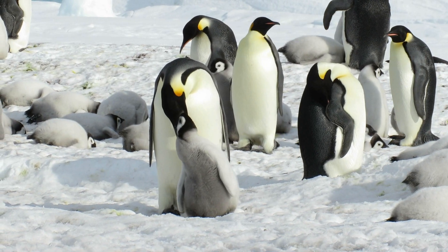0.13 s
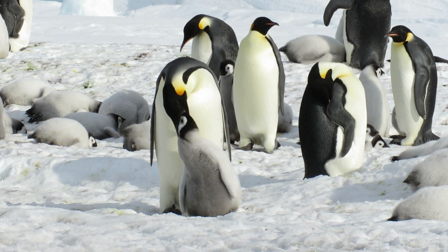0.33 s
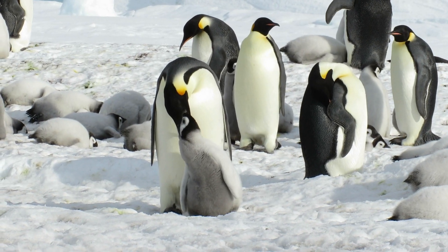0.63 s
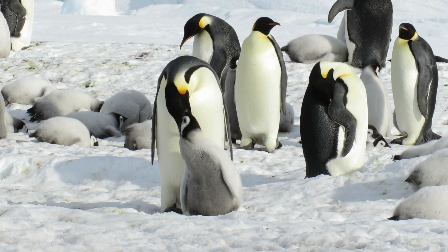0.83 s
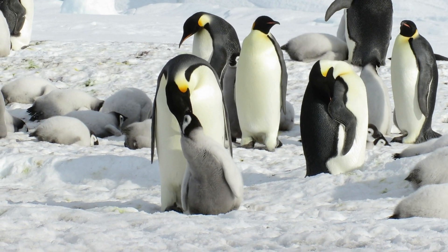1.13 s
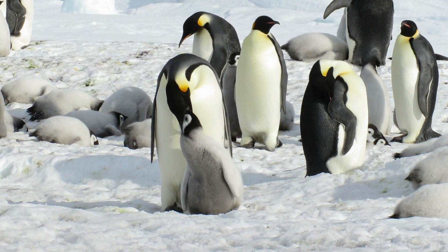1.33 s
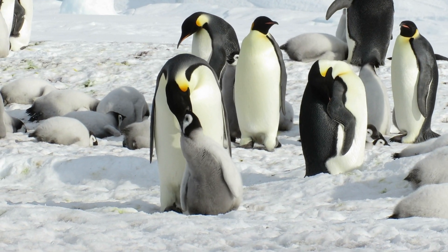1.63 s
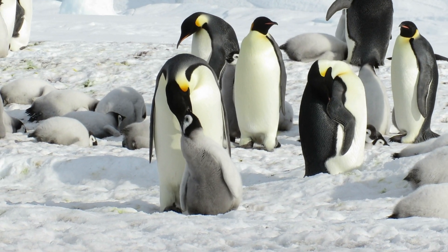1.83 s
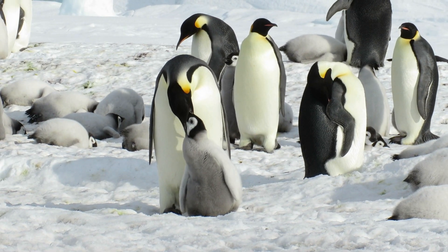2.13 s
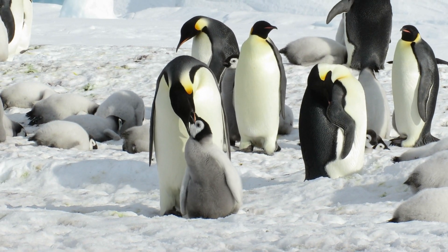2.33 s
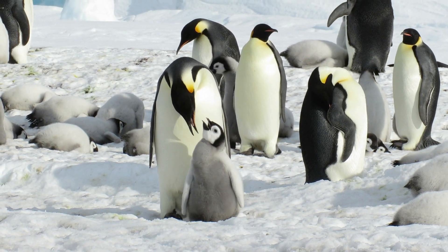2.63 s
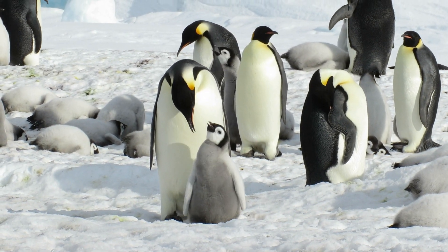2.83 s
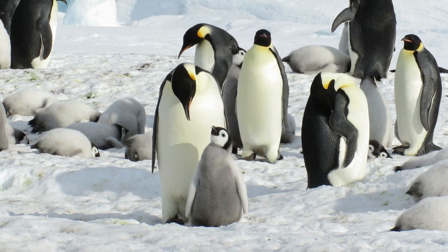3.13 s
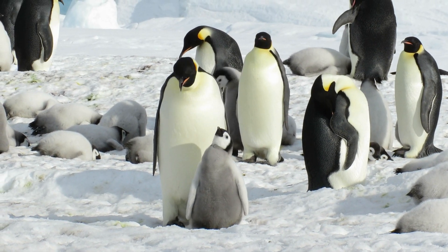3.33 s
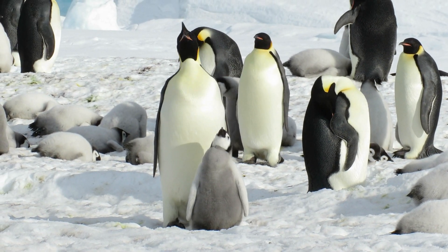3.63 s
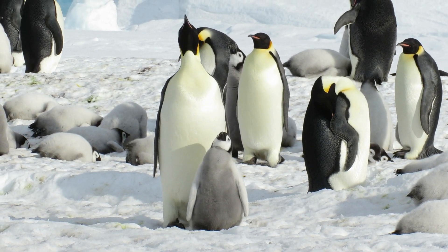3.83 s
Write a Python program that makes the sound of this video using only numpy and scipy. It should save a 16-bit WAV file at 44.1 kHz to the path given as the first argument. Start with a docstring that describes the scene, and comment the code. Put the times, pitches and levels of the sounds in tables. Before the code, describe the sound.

Penguin chicks beg with high, warbling whistles that mostly sink, at about 0.1-0.7 and 1.2-1.75 seconds, overlapped by peeps, thin chirps, steep swoops and brief grainy rasps. After a sparser gap, a brighter whistle falls at 2.3-2.55. Swoops cluster around 2.8-3.2, a faint pure whistle follows, then sharper swoops from 3.65 to 4. Distant colony chatter and low wind continue; a faint adult drone enters near 3.7. Open, dry air.

```python
"""Penguin chicks beg on open snow: the nearest give long warbling whistles, most of them sinking at the end,
their neighbours gentle peeps, steep swoops and thin chirps, with grainy rasps at times.
Behind them lie the chatter of the far colony, a low wind and, near the end, a faint drone of far adults.
Each chick voice is a few harmonics of a moving pitch, weighted by throat resonances, hoarse in fast glides;
rasps, wind, drone and the blur of the farthest chicks are filtered noise."""
import sys
import numpy as np
from scipy.fft import rfft, irfft, next_fast_len
from scipy.io import wavfile

SR = 44100
rng = np.random.default_rng(int(sys.argv[2]) if len(sys.argv) > 2 else 0)


def to_wav(sig):
    """Store sig (one row per channel, or 1-D mono) as 16-bit WAV at the path in sys.argv[1].

    Samples outside -1..1 are clipped; the rate is SR.
    """
    pcm = np.clip(np.atleast_2d(sig), -1, 1) * 32767
    pcm = np.round(pcm).astype(np.int16)
    wavfile.write(sys.argv[1], SR, pcm.T)  # frames by channels


N = 176400
T = np.arange(N) / SR

# resonances of throat and bill: (frequency [Hz], relative gain [dB])
THROAT = [(900, -17), (1350, -1.5), (1750, 0), (2100, -2), (2800, -16.5), (3500, -14), (5200, -28),
          (9000, -44), (15000, -64)]
SMALL_THROAT = [(900, -11.5), (1450, -1), (2100, 2.5), (2750, -14.5), (4250, -12), (5300, -30),
                (15000, -60)]
# spectrum of hoarse noise: (frequency [Hz], relative gain [dB])
RASP_SPECTRUM = [(1000, -19), (1800, 6), (4000, 6.5), (7000, -15), (15000, -26.5)]

# shared by swoops and chirps; tilts are per octave above the fundamental
SMALL_VOICE_TILT_DB = -1.5
PITCH_JITTER, SHIMMER_DB, OVERTONE_FLUTTER_DB = 0.0041, 2.5, 5  # jitter: share of the pitch
RELEASE_S = 0.012


def amp(db):
    """Decibels to amplitude."""
    return 10 ** (np.asarray(db) / 20)


def unit(x):
    """x scaled to rms 1."""
    return x / np.sqrt(np.mean(x ** 2) + 1e-20)


def along(points, hz):
    """(Hz, dB) points interpolated on a log frequency axis."""
    point_hz, point_db = np.transpose(points)
    return np.interp(np.log(hz + 1), np.log(point_hz + 1), point_db)


def wobble(knots_per_s, size):
    """Random curve: straight lines between normal random knots."""
    knots = rng.standard_normal(int(size * knots_per_s / SR) + 4)
    return np.interp(np.arange(size) * knots_per_s / SR, np.arange(len(knots)), knots)


def glide(s, v, t):
    """Smooth cubic curve through the points (s, v); inner slopes are limited against overshoot."""
    span = np.maximum(np.diff(s), 1e-4)
    slope = np.diff(v) / span
    # harmonic mean of neighbouring slopes, zero at a turning point
    inner = 2 * np.maximum(slope[:-1] * slope[1:], 0) / (slope[:-1] + slope[1:] + 1e-9)
    knot_slope = np.r_[2 * slope[0] - inner[0], inner, 2 * slope[-1] - inner[-1]]
    i = np.clip(np.searchsorted(s, t) - 1, 0, len(slope) - 1)
    u = (t - s[i]) / span[i]
    start_bend = (knot_slope[i] - slope[i]) * (1 - u)
    end_bend = (knot_slope[i + 1] - slope[i]) * u
    return v[i] + span[i] * u * (slope[i] + (1 - u) * (start_bend - end_bend))


def filtered(x, response):
    """x with its spectrum multiplied by a response of frequency."""
    size = next_fast_len(N + SR // 2)
    return irfft(rfft(x, size) * response(np.fft.rfftfreq(size, 1 / SR)), size)[:N]


def noise(spectrum):
    """Coloured noise of rms 1."""
    return unit(filtered(rng.standard_normal(N), lambda hz: amp(along(spectrum, hz))))


def add(out, start_s, x):
    """Mix x into out at start_s, cut to its ends."""
    i = int(start_s * SR)
    x = x[max(-i, 0):max(N - i, 0)]
    out[max(i, 0):][:len(x)] += x


def voice(pitch_hz, throat, tilt_db, evenness=0, hoarse_db=-70, jitter=PITCH_JITTER, attack_s=0.0043, count=3):
    """Harmonics of an unsteady pitch through a throat, hoarse in fast glides; evenness 1 levels the gains."""
    n = len(pitch_hz)
    k = np.arange(1, count + 1)[:, None]
    phase = 2 * np.pi * np.cumsum(pitch_hz * (1 + jitter * wobble(600, n))) / SR

    flutter = np.array([wobble(48.05, n) for _ in k]) * (k > 1)
    gains_db = along(throat, k * pitch_hz) + tilt_db * np.log2(k) + OVERTONE_FLUTTER_DB * flutter
    gains = amp(gains_db) * (k * pitch_hz < SR / 2)
    gains = gains / np.linalg.norm(gains, axis=0) ** evenness
    tone = unit((gains * np.sin(k * phase)).sum(0))

    # hiss grows with glide speed and pulses once per pitch cycle
    hiss_gain = amp(along(RASP_SPECTRUM, np.fft.rfftfreq(n, 1 / SR)))
    hiss = unit(irfft(rfft(rng.standard_normal(n)) * hiss_gain, n))
    octaves_per_s = np.abs(np.gradient(np.log2(pitch_hz))) * SR
    hoarse = amp(hoarse_db) * octaves_per_s * (1 + np.cos(phase))

    t = np.arange(n) / SR
    gate = np.clip(t / attack_s, 0, 1) * np.clip((t[-1] - t) / RELEASE_S, 0, 1)
    return (tone + hoarse * hiss) * gate * amp(SHIMMER_DB * wobble(250, n))


def wind():
    """Wind: a steady rush of coloured noise, with soft low puffs where it touches the microphone."""
    # wind spectrum: (frequency [Hz], relative gain [dB])
    air = [(25, -22.5), (62, -1), (200, -7.5), (700, -12.5), (1200, -5.5), (4000, -29.5), (15000, -36)]
    # puffs: middle [s]
    puff_times = [2.1, 3.27]
    wind_db = -66.5
    puff_db, puff_scale_hz, puff_half_s = -65.5, 85.5, 0.036
    puffs = sum(np.exp(-((T - s) / puff_half_s) ** 2) for s in puff_times)
    rumble = unit(filtered(rng.standard_normal(N), lambda hz: hz * np.exp(-(hz / puff_scale_hz) ** 2)))
    return amp(wind_db) * noise(air) + amp(puff_db) * puffs * rumble


def adults():
    """Far adults: noise in two resonances an octave apart, a faint, blurred, pulsing drone."""
    # drone level: (time [s], level [dB])
    drone_level = [(3.6, -83), (3.8, -66.5)]
    drone_hz, half_width_hz = 444, 40

    def response(hz):
        return sum(k ** -2 / (1 + ((hz - k * drone_hz) / half_width_hz) ** 2) for k in (1, 2))

    drone = filtered(rng.standard_normal(N), response)
    pulsing = unit(drone * amp(1.1 * wobble(20, N)))
    return amp(np.interp(T, *np.transpose(drone_level))) * pulsing


def colony():
    """Far chicks: random calls, short ones swinging widely in pitch, over a noise blur of still farther ones."""
    centre_hz, blur_width, blur_db = 1680, 0.28, -70  # width: share of each band's centre
    calls_per_s, softest_db, spread_db = 70, -71, 12
    pitch_swing, tilt_db = 0.26, 4  # swing in natural log of pitch

    def response(hz):
        return sum(k ** -2 * np.exp(-((hz / k / centre_hz - 1) / blur_width) ** 2) for k in (1, 2))

    blur = filtered(rng.standard_normal(N), response)
    out = amp(blur_db + 6 * wobble(25, N)) * unit(blur)
    for when, length, size, pitch, turn in rng.random((int(calls_per_s * N / SR), 5)):
        length_s = 0.03 + 0.11 * length ** 2
        u = np.linspace(0, 1, int(length_s * SR))
        bend = (1 - length ** 2) * np.sin(2 * np.pi * (u + turn))
        pitch_hz = centre_hz * np.exp(pitch_swing * (pitch - 0.5 + bend))
        call = voice(pitch_hz, THROAT, tilt_db, attack_s=RELEASE_S, count=2)
        add(out, when * N / SR - len(u) / SR / 2, amp(softest_db + spread_db * size ** 3) * call)
    return out


def rasps():
    """Rasps: noise with fast random level flutter swells where a voice breaks up."""
    # hoarse stretches: (middle [s], half length to 1/e [s], peak level [dB])
    stretches = [(0.162, 0.043, -54.5), (1.002, 0.0096, -56), (1.2, 0.033, -53.5), (3.0, 0.17, -71.5),
                 (3.71, 0.021, -60)]
    swell = sum(amp(db) * np.exp(-((T - s) / half_s) ** 2) for s, half_s, db in stretches)
    grain = unit(noise(RASP_SPECTRUM) * amp(4.5 * wobble(450, N)))
    return swell * grain


def chirps():
    """Thin chirps: a quick arch of pitch, up and down again, in two harmonics."""
    # chirps: middle [s]
    middles = [0.047, 0.087, 0.429, 0.863, 1.802, 2.566]
    length_s, top_hz, drop, level_db = 0.045, 2630, 0.35, -53.5  # drop: share of the top pitch
    out = np.zeros(N)
    u = np.linspace(-1, 1, int(length_s * SR))
    pitch_hz = top_hz * (1 - drop * u ** 2)
    for middle_s in middles:
        call = voice(pitch_hz, SMALL_THROAT, SMALL_VOICE_TILT_DB, evenness=0.26, attack_s=0.0082, count=2)
        add(out, middle_s - length_s / 2, amp(level_db) * call)
    return out


def swoops():
    """Swoops: the pitch plunges, rests low and shoots up; the flanks cross the throat resonances hoarsely."""
    # swoops: (start [s], end [s], lowest pitch [Hz], level [dB])
    calls = [(0.0, 0.066, 1175, -57), (0.09, 0.19, 1345, -50.5), (0.22, 0.251, 2300, -44),
             (0.254, 0.319, 2093, -49), (0.342, 0.396, 1552, -45.5), (0.466, 0.526, 1512, -44),
             (0.567, 0.607, 1614, -46.5), (0.922, 1.004, 1510, -51), (1.825, 1.919, 1427, -56.5),
             (2.065, 2.128, 1293, -58.5), (2.775, 2.821, 1643, -57), (2.911, 2.972, 1557, -53.5),
             (2.921, 2.999, 1374, -48), (3.0, 3.101, 1602, -55), (3.013, 3.101, 1154, -51),
             (3.105, 3.196, 923, -52), (3.644, 3.712, 1313, -59), (3.679, 3.736, 1692, -52.5),
             (3.812, 3.854, 1957, -43.5), (3.888, 3.959, 1462, -43.5), (3.98, 4.035, 1303, -43.5)]
    edge_hz, steepness, jitter = 2750, 2.1, 0.016  # jitter: roughness, share of the pitch
    out = np.zeros(N)
    for start_s, end_s, low_hz, db in calls:
        u = np.abs(np.linspace(-1, 1, int((end_s - start_s) * SR)))
        pitch_hz = low_hz * (edge_hz / low_hz) ** (u ** steepness)
        call = voice(pitch_hz, SMALL_THROAT, SMALL_VOICE_TILT_DB, hoarse_db=-53.5, jitter=jitter, count=4)
        add(out, start_s, amp(db) * call)
    return out


def peeps():
    """Neighbours' peeps: a soft start and a gentle parabolic bend of pitch, louder near the throat resonance."""
    # (start [s], end [s], first pitch [Hz], turning pitch [Hz], last pitch [Hz], level before gain_db [dB])
    calls = [(0.094, 0.189, 2382, 2000, 2214, -48), (0.267, 0.363, 1653, 1680, 1840, -48),
             (0.367, 0.418, 2120, 1923, 2166, -45.5), (0.62, 0.684, 1420, 1740, 1370, -50.5),
             (0.828, 0.906, 2000, 1451, 1720, -54), (0.988, 1.12, 1750, 1224, 1560, -63),
             (1.117, 1.171, 1450, 1800, 1840, -51.5), (1.163, 1.22, 1900, 1407, 1970, -48.5),
             (1.221, 1.41, 1797, 1202, 1250, -54.5), (1.322, 1.381, 1603, 1793, 1793, -48.5),
             (1.542, 1.599, 2300, 1524, 1523, -47), (2.236, 2.404, 1730, 1316, 1366, -54.5),
             (2.834, 2.887, 1667, 1610, 2260, -52.5), (3.081, 3.223, 1750, 1378, 1780, -48),
             (3.78, 3.911, 1936, 1554, 1807, -55)]
    gain_db, tilt_db, attack_s = 4, -4, 0.018
    out = np.zeros(N)
    for start_s, end_s, first_hz, turn_hz, last_hz, db in calls:
        u_first = -abs(first_hz - turn_hz) ** 0.5
        u_last = abs(last_hz - turn_hz) ** 0.5
        u = np.linspace(u_first, u_last, int((end_s - start_s) * SR))
        pitch_hz = turn_hz + np.sign(first_hz + last_hz - 2 * turn_hz) * u ** 2
        add(out, start_s, amp(db + gain_db) * voice(pitch_hz, THROAT, tilt_db, attack_s=attack_s))
    return out


def whistles():
    """Near chicks: pitch and level swing along turning points; one smaller throat, one call without overtones."""
    # turning points of each whistle: (time [s], pitch [Hz], level before gain_db [dB])
    whistle_1 = [(0.122, 1928, -40), (0.143, 2010, -43.5), (0.162, 1571, -67), (0.172, 1927, -36.5),
                 (0.211, 1570, -40), (0.243, 1837, -34.5), (0.284, 1471, -44), (0.355, 942, -49.5)]
    whistle_2 = [(0.448, 1764, -38), (0.468, 1605, -42), (0.509, 1226, -46.5), (0.553, 1615, -40),
                 (0.575, 1767, -36.5), (0.614, 1393, -42), (0.65, 1201, -47), (0.681, 1268, -48.5),
                 (0.733, 951, -53)]
    whistle_3 = [(1.161, 2063, -34), (1.185, 2063, -36.5), (1.201, 1654, -52.5), (1.22, 2066, -34.5),
                 (1.239, 1844, -33.5), (1.264, 1725, -40), (1.29, 1986, -33), (1.333, 1619, -37.5),
                 (1.38, 1112, -48), (1.427, 991, -48.5)]
    whistle_4 = [(1.464, 1736, -46.5), (1.482, 1675, -42.5), (1.527, 1211, -48), (1.59, 1753, -38),
                 (1.632, 1430, -43.5), (1.666, 1288, -46), (1.751, 930, -59)]
    small_throat_whistle = [(2.281, 2537, -39), (2.296, 2100, -29.5), (2.332, 2383, -31),
                            (2.348, 1963, -29.5), (2.382, 1622, -39), (2.416, 1967, -32),
                            (2.457, 1634, -39.5), (2.509, 1068, -51), (2.554, 951, -53)]
    short_whistle = [(0.151, 1695, -48.5), (0.177, 1338, -49), (0.188, 2036, -36.5), (0.207, 2350, -41.5),
                     (0.233, 1740, -32)]
    pure_whistle = [(3.268, 1710, -46.5), (3.312, 1356, -49), (3.36, 1050, -69)]
    gain_db, tilt_db = 0.5, -3
    calls = (whistle_1, whistle_2, whistle_3, whistle_4, small_throat_whistle, short_whistle, pure_whistle)
    out = np.zeros(N)
    for call in calls:
        s, hz, db = np.transpose(call)
        t = np.arange(s[0], s[-1], 1 / SR)
        throat = SMALL_THROAT if call is small_throat_whistle else THROAT
        count = 1 if call is pure_whistle else 5
        tone = voice(glide(s, hz, t), throat, tilt_db, evenness=0.73, count=count)
        add(out, s[0], amp(gain_db + glide(s, db, t)) * tone)
    return out


def scene():
    """All sources sum dry, without echo."""
    background = wind() + adults() + colony()
    near = rasps() + chirps() + swoops() + peeps() + whistles()
    return (background + near)[None]


def record(dry):
    """Band limit with a sharp upper edge, after a short fade at the end."""
    top_hz, fade_s = 15650, 0.004
    fade = np.clip((T[-1] - T) / fade_s, 0, 1)
    return filtered(dry[0] * fade, lambda hz: hz < top_hz)[None]


dry = scene()
out = record(dry)
to_wav(out)
```